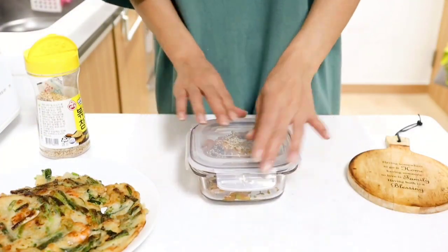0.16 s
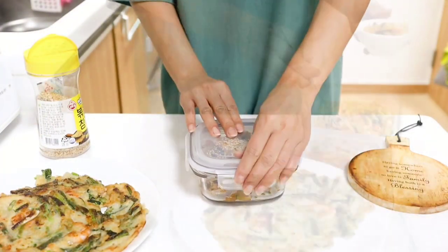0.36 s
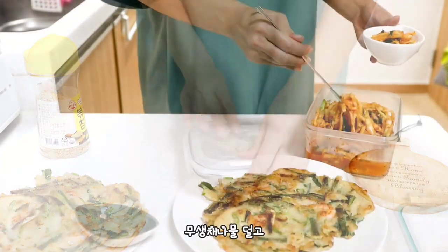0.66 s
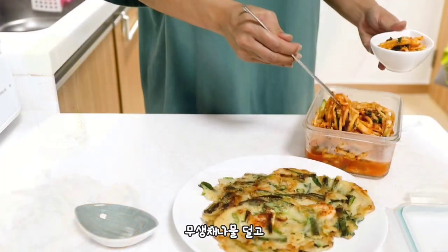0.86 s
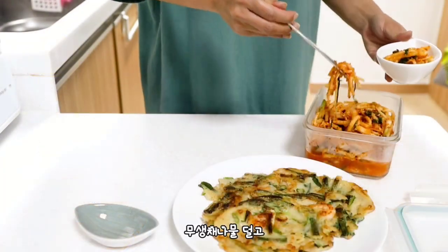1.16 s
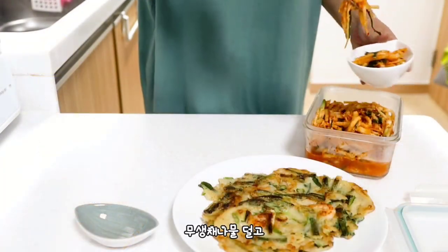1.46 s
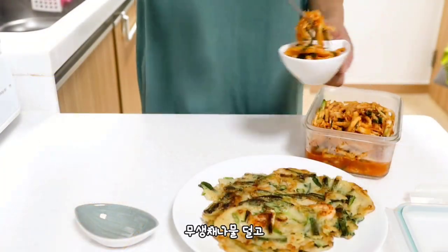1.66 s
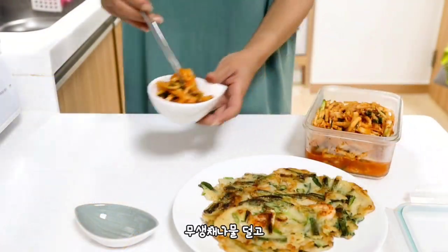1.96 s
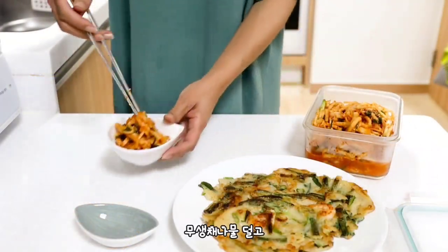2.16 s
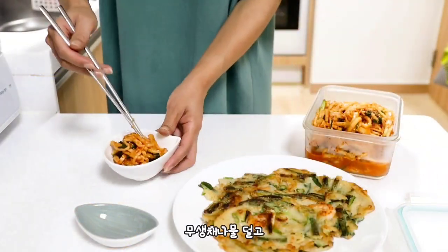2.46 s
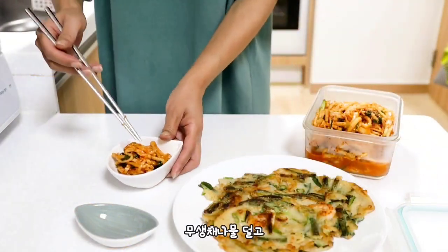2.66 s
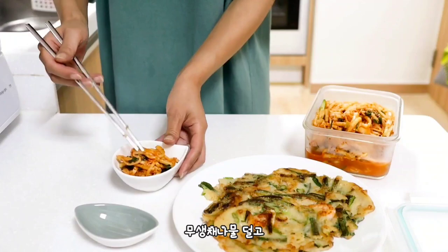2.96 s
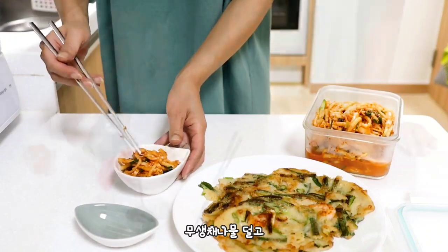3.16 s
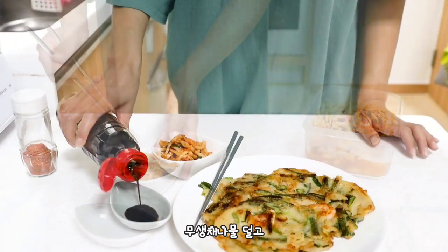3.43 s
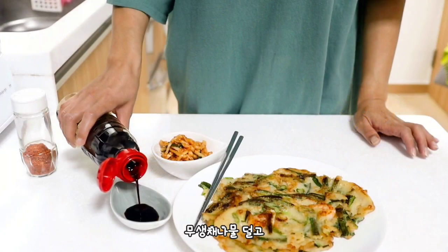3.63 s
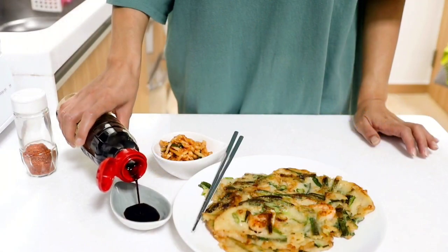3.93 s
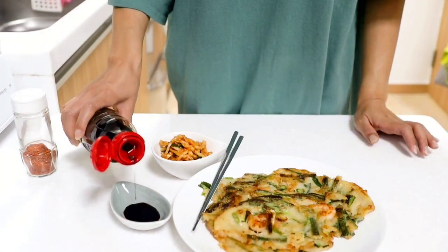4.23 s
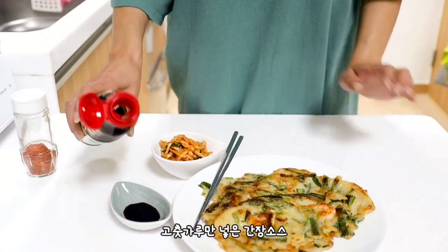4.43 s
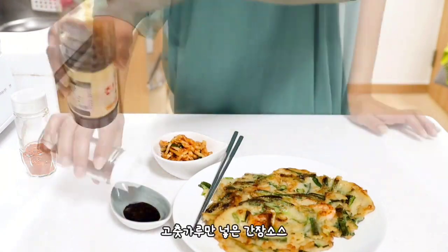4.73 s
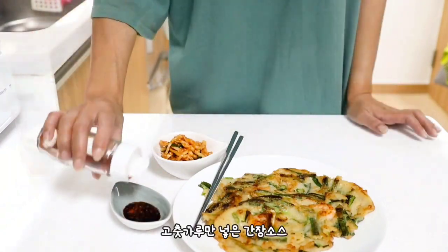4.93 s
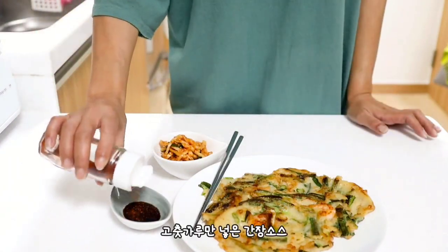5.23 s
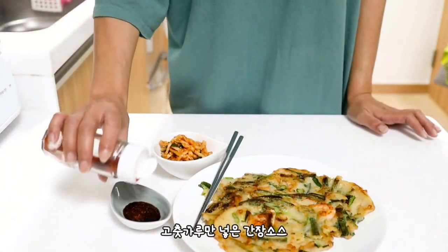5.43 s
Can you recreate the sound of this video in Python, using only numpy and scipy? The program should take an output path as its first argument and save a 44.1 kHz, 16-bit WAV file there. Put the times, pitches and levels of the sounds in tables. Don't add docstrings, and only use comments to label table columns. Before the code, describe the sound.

A home kitchen heard close up on a small stereo microphone, with a low, slightly unsteady fan hum, airy rush and soft hiss throughout. At 0 s a hard plastic flap has just snapped on a glass box, its tail ringing in the room. Dull finger thumps come around 0.3 s, small clicks at 0.4, then two very loud, bright snaps at about 0.44 and 0.51 s, slightly overloaded, with a half-second hard-walled decay. Mostly fan follows, with minute chopstick ticks from 1.5 to 2 s. Faint rustling and thin high squeaks lead to a loud, damped dish knock at 2.65 s, thumpy and short. A bowl lands much more softly at 3.12 s in quick touches, and again, duller, at 3.34 s. Around 4.4 s a cap ticks faintly with a very quiet squeak; a bottle touch at 4.6 and a jar touch at 4.8 s follow, with slight rustling fading toward 5.6 s.

```python
import sys
import numpy as np
from scipy import signal
from scipy.fft import rfft, irfft, next_fast_len
from scipy.io import wavfile
from scipy.ndimage import uniform_filter1d, map_coordinates

SR = 44100
rng = np.random.default_rng(int(sys.argv[2]) if len(sys.argv) > 2 else 0)


def field_ratio(decibels):
    return 10 ** (np.asarray(decibels, dtype=float) / 20)


def waveform_to_disk(signal):
    frames = np.transpose(np.atleast_2d(signal))
    scaled = np.clip(frames, -1, 1) * 32767
    samples = np.round(scaled).astype(np.int16)
    wavfile.write(sys.argv[1], SR, samples)


N = 246519
LEAD = SR // 10


# frequency in Hz, level in dB, t60 in s.
SIDE_MODES = [(743, -26, 0.0146), (1940, 14, .02), (5270, 6, 0.0087)]
FRONT_MODES = [(570, -16.5, 0.028), (855, -17.5, 0.021), (1434, -22, 0.025), (2550, -12, 0.005),
               (3100, -4, 0.0068), (3970, 1.5, 0.0047), (4600, -4, 0.0072), (5720, -4, 0.0084),
               (6950, 8.5, 0.0031), (7700, -10, 0.0029), (9900, -19, 0.0058), (10960, -5.5, 0.012),
               (15000, -27, 0.00523)]
BACK_MODES = [(980, -10.5, 0.011), (1410, -14, 0.023), (1710, -11, 0.014), (1950, 3.5, 0.0055),
              (2360, -4.5, 0.011), (2910, -11, 0.011), (3900, -3, 0.0096), (4150, -5, 0.011),
              (4960, -2.5, 0.0048), (6440, -1, 0.00313), (8400, -16, 0.014), (9170, -1, 0.0044),
              (10700, -14, 0.005), (14700, -23, 0.00586)]
# frequency in Hz, level in dB per Hz.
SIDE_POWER = [(200, -25), (400, -10.5), (800, -7), (1450, -7), (1950, 0.5), (2300, -8.5), (2700, -12),
              (4500, -11), (5400, -9.5), (6500, -16), (8400, -14.5), (11200, -20.5), (12500, -32),
              (15000, -46)]
FRONT_POWER = [(180, -35), (300, -9.5), (627, -1), (884, -11), (1310, -6), (1420, -6), (1590, -14),
               (4390, -11), (7060, -15), (10800, -28), (11900, -25), (12500, -72.5), (15000, -103)]
BACK_POWER = [(200, -35), (500, -31), (800, -2), (1440, -2.5), (2100, -1.5), (2700, -7.5), (3400, -9.5),
              (4100, 1), (4500, -4), (5100, -7), (5900, -12), (8000, -11.5), (10100, -8.5), (11600, -21),
              (13000, -64)]
# start in s, peak in dB, contact time in ms, room in dB, left minus right in dB.
SIDE_SNAPS = [
    (-.035, 2.5, 0.05, -23.5, 0),
]
FRONT_SNAPS = [
    (.4350, 2.7, 0.075, -31.5, -.6),
]
BACK_SNAPS = [
    (0.5132, 3.1, 0.04, -25.5, 0.1),
]


def lid_flaps():
    lid = blows(SIDE_MODES, SIDE_POWER, SIDE_SNAPS, crack_db=-20, wide_db=-4)
    lid += blows(FRONT_MODES, FRONT_POWER, FRONT_SNAPS, crack_db=-12.5, wide_db=-11)
    lid += blows(BACK_MODES, BACK_POWER, BACK_SNAPS, crack_db=-13, wide_db=-7.5)
    return lid


# frequency in Hz, level in dB, t60 in s.
DISH_MODES = [(112, -28.5, 0.15), (222, -19.5, 0.088), (272, -15, 0.055), (394, -24, 0.042),
              (590, -25, 0.021), (720, -3, 0.014), (954, -10.5, 0.034), (1115, -9.5, 0.038),
              (1340, -18, 0.02), (1680, -8, 0.024), (2127, 4, 0.016), (2534, 2.5, 0.012), (3100, 1, 0.0084),
              (3800, -17, 0.017)]
# frequency in Hz, level in dB per Hz.
DISH_POWER = [(60, -38), (110, 2.5), (210, -1.5), (330, -3.5), (460, -3.5), (760, 1.5), (1100, -0.5),
              (1400, -1), (2050, 2), (2700, -7.5), (3300, -17.5), (3900, -27.5), (5300, -32), (6200, -52),
              (9000, -74)]
# start in s, peak in dB, contact time in ms, room in dB, left minus right in dB.
DISH_KNOCKS = [
    (2.6507, 5.007, 0.13, -21.5, -0.036),
]


def dish():
    return blows(DISH_MODES, DISH_POWER, DISH_KNOCKS, crack_db=-17, wide_db=-4.0)


# frequency in Hz, level in dB, t60 in s.
BOWL_MODES = [(270, -4.5, 0.046), (584, 5, 0.032), (726, 2.5, 0.061), (826, -4, 0.076), (965, -23, 0.046),
              (1347, 2, 0.045), (1543, -0.5, 0.047), (1740, 8, 0.016), (2200, 9, 0.04), (2680, 6.5, 0.019),
              (3060, -0.5, 0.035), (3470, -7, 0.035), (4880, -24, .07)]
# frequency in Hz, level in dB per Hz.
BOWL_POWER = [(88, -55), (150, -28), (242, -2), (442, -11.5), (650, -6.5), (724, 2), (794, -8), (986, -4.5),
              (1080, -11), (1470, -9.5), (1800, -10), (1970, -8), (2270, -13.5), (2860, -23), (6000, -68),
              (7800, -81), (13200, -120)]
# start in s, peak in dB, contact time in ms, room in dB, left minus right in dB.
BOWL_SET_DOWNS = [
    (3.065, -39, 0.3, -4.5, .1),
    (3.1170, -26, 0.2, -24, 0.85),
    (3.1212, -19.5, 0.22, -12.5, 1.36),
    (3.1240, -19.5, 0.196, -11.5, 5.9),
    (3.3434, -22.5, 0.55, -18, 2.1),
    (3.3481, -22.5, 0.26, -19, 2.6),
]


def bowl():
    return blows(BOWL_MODES, BOWL_POWER, BOWL_SET_DOWNS, crack_db=-46, wide_db=3.0)


# delay in s, level in dB.
WALL_ECHOES = [(.0135, -25), (0.03, -51), (0.044, -31.5)]


def blows(modes, power, rows, crack_db, wide_db):
    track = np.zeros((2, N + LEAD))
    t = np.arange(SR // 50) / SR
    for s, db, contact_ms, room_db, pan_db in rows:
        struck = [(hz, level - 10 * np.log10(1 + (hz * contact_ms / 400) ** 4), t60) for hz, level, t60 in modes]
        pair = ring(struck, contact_ms / 700, pan_db, wide_db)
        add(track, s, field_ratio(db) * pair)

        contact_samples = max(2, round(contact_ms * SR / 1000))
        noise = uniform_filter1d(rng.standard_normal((2, len(t))), size=contact_samples, axis=1)
        crack = 0.85 * noise[0] + 1.2 * np.gradient(noise[1]) * np.array([[1], [-1]])
        add(track, s, field_ratio(db + crack_db - 60 * t / 0.014) * crack)

        for delay_s, wall_db in WALL_ECHOES:
            scatter = uniform_filter1d(rng.standard_normal((2, 96)), size=4, axis=1) / 5
            echo = signal.fftconvolve(pair, scatter, axes=1)
            add(track, s + delay_s, field_ratio(db + wall_db) * echo)
        add(track, s, field_ratio(db + room_db) * room(power))
    return track[:, LEAD:]


# frequency in Hz, side minus mid in dB.
NEAR_SIDE = [(300, -37), (1000, -8.5), (2400, -3), (5000, 1.5), (9000, 2.5), (15000, 4)]


def ring(modes, rise_s, pan_db, wide_db=0):
    t = np.arange(SR // 5) / SR
    hz, db, t60 = np.transpose(modes)[:, :, None]
    size = field_ratio(db - 60 * t / t60) * (1 - np.exp(-t / rise_s)) ** 2
    phase = 2 * np.pi * rng.random((2, len(modes), 1))
    mid = np.sum(size * np.sin(2 * np.pi * hz * t + 0.14 * phase[0]), 0)
    side_size = size * field_ratio(along(NEAR_SIDE, hz) + wide_db)
    side = np.sum(side_size * np.sin(2 * np.pi * hz * t + phase[1]), 0)
    return np.array([mid + side, mid - side]) * field_ratio([[pan_db / 2], [-pan_db / 2]])


# frequency in Hz, t60 in s.
ROOM_T60 = [(150, 0.45), (500, 0.6), (2000, 0.47), (5000, 0.44), (10000, 0.44), (15000, 0.39)]


def room(power):
    hz, t, z = signal.stft(rng.standard_normal((2, SR * 3 // 4)), SR, nperseg=128)
    build = 1 - np.exp(-np.clip(t - .004, 0, None) / 0.0075)
    decay = field_ratio(-60 * t / along(ROOM_T60, hz)[:, None])
    tail = signal.istft(z * build * decay, SR, nperseg=128)[1]
    tail = diffuse(tail, power)
    return tail / np.std(tail[:, :SR // 10])


# frequency in Hz, level in dB, t60 in s.
HINGE = [(1093, -4, .01), (2200, -6, .008), (4540, -14, 0.0062), (11300, -19, .004)]
RIM = [(517, -0.5, 0.019), (1184, -5, 0.013), (1900, -5.5, 0.011)]
CAP = [(3150, 0, 0.011), (4760, 1, 0.0073), (5600, 3, 0.0057), (6500, -5, 0.0046), (9900, -5, .005)]
CAP_STRAP = [(2610, -3, .028), (3140, 0.5, .016)]
BOTTLE = [(1883, -3.5, .04), (2800, -11, 0.022), (4500, -12, .006), (5900, -15, 0.0095),
          (8300, -12, 0.0044)]
JAR = [(282, -1.8, 0.08), (3700, -15, 0.01), (4800, -16, 0.0058), (7500, -18, 0.0065), (10330, -17, .008)]
JAR_LID = [(7690, 4, .005), (10600, 2, 0.009), (13200, -11.5, .005)]
# start in s, peak in dB, left minus right in dB, modes of the thing.
CONTACTS = [
    (.382, -24, -2, HINGE),
    (0.3957, -18.5, 1, RIM),
    (.491, -18, 2, RIM),
    (4.3985, -35.5, 8, CAP),
    (4.435, -35, 0, CAP_STRAP),
    (4.6245, -26, 8, BOTTLE),
    (4.788, -24.5, 2, JAR),
    (4.8265, -40, 4, JAR_LID),
]
# start in s, peak in dB, frequency in Hz, t60 in s, left minus right in dB.
TOUCHES = [(.284, -42, 2810, 0.0087, -.4), (0.302, -17, 132, 0.041, 1), (0.313, -21, 85.6, 0.099, 0.1),
           (0.322, -21, 141, 0.042, -3), (0.4246, -17.5, 1390, 0.0215, 6), (0.423, -21, 3100, 0.0073, -3),
           (.4265, -17, 590, 0.009, 7.5), (1.5475, -42, 11400, .005, -0.94), (1.789, -35.5, 9900, .005, -1),
           (1.847, -48, 10470, 0.0044, 2), (1.883, -43, 11800, .003, 0.1), (1.952, -53, 4900, .09, 2),
           (4.291, -39, 9600, 0.007, -9), (4.426, -40, 4400, 0.011, 8), (4.646, -34, 3961, 0.026, 8)]


def handling():
    skin_s = 0.000087
    track = np.zeros((2, N + LEAD))
    single = [(s, db, pan_db, [(hz, 0, t60)]) for s, db, hz, t60, pan_db in TOUCHES]
    for s, db, pan_db, modes in single + CONTACTS:
        pair = np.zeros((2, SR // 5))
        for hz, level, t60 in modes:
            group = [(hz, level, t60), (hz * 1.3, level - 12.5, t60 * 0.95), (hz * .86, level - 12, t60 * .6)]
            pair += ring(group, skin_s + 0.31 / hz, pan_db)
        add(track, s, field_ratio(db) * pair)
        flat_room = room([(100, 0.0041), (16000, 0)])
        add(track, s, field_ratio(db - 50) * signal.fftconvolve(pair[:1], flat_room, axes=1))
    return track[:, LEAD:]


# start in s, rise in s, fall in dB per s, rms in dB.
RUSTLES = [
    (2.202, 0.16, 26, -61),
    (4.25, .08, 18, -63),
    (4.55, 0.22, 45, -54.5),
    (4.9, .1, 18, -66),
]
RUSTLE_STOPS_S = [2.65, 4.7, 5.3, 5.59]
# frequency in Hz, level in dB per Hz.
RUSTLE_COLOUR = [(4000, -44), (6000, -11), (9500, -6), (12000, -8), (15000, -23), (16500, -39)]


def rustle():
    t = np.arange(N) / SR
    size = np.zeros(N)
    for (s, rise_s, fall_db, db), stop_s in zip(RUSTLES, RUSTLE_STOPS_S):
        swell = np.clip((t - s) / rise_s, 0, 1) ** 2
        fade = field_ratio(db - fall_db * np.clip(t - s - rise_s, 0, None))
        size += swell * fade * (t < stop_s)
    grainy = rng.standard_normal((2, N)) * field_ratio(3.3 * wobble(90))
    return size * unit(diffuse(grainy, RUSTLE_COLOUR))


# start in s, length in s, first and last frequency in Hz, rms in dB.
SQUEAKS = [
    (2.4, .13, 12950, 12750, -71),
    (2.565, .05, 12900, 12600, -72),
    (4.42, .2, 11700, 12400, -77),
    (4.42, .22, 10500, 11350, -71),
]


def squeaks():
    fade_s = .015
    out, t = np.zeros(N), np.arange(N) / SR
    for s, length_s, first_hz, last_hz, db in SQUEAKS:
        hz = np.interp(t, [s, s + length_s], [first_hz, last_hz])
        hz = hz + 40 * wobble(150) + 70 * wobble(20)
        sounding = np.clip(np.minimum(t - s, s + length_s - t) / fade_s, 0, 1)
        size = sounding * field_ratio(db + 6.1 * wobble(25) + 3.6 * wobble(60))
        out += size * np.sin(2 * np.pi * np.cumsum(hz) / SR)
    return out * np.array([[1.6], [.4]])


# time in s, level in dB.
AIR_LEVEL = [(0.0, -40.5), (0.2, -42), (1.87, -38), (2.3, -39), (2.79, -39), (3.5, -41.5), (4.13, -37.5),
             (4.86, -42.5), (5.15, -38.5), (5.59, -39)]
# frequency in Hz, level in dB per Hz.
RUSH_COLOUR = [(12, -44), (20, -13.5), (49, -2.5), (127, -11), (144, -6), (161, -6), (187, -3), (248, -6),
               (272, -6), (376, -6.5), (459, -9), (645, -7), (800, -14.5), (1040, -40), (1760, -120)]
HISS_COLOUR = [(470, -12.5), (800, -3.5), (896, -3.5), (978, 0.5), (1240, -7), (1350, -2), (1480, -7),
               (2020, -12), (2210, -13.5), (2600, -17.5), (8130, -33.5), (11400, -34), (14700, -47),
               (16000, -58)]


def fan():
    rush_db, hiss_db, hum_db, hum_hz = 0.5, -1.5, -1.5, 161.8
    hiss_follows, hum_follows = 0.68, 0.35
    level_db, = curves(AIR_LEVEL)
    mean_db = level_db.mean()
    swing_db = level_db - mean_db
    noise = rng.standard_normal((2, 2, N))
    rush = field_ratio(rush_db + swing_db + 0.38 * wobble(10.0)) * unit(diffuse(noise[0], RUSH_COLOUR))
    hiss_size = field_ratio(hiss_db + hiss_follows * swing_db + 0.32 * wobble(5.55))
    hiss = hiss_size * unit(diffuse(noise[1], HISS_COLOUR))
    unsteady_db = 1.5 * wobble(6)
    drift_hz = 1.2 * wobble(10) + wobble(1)
    hum_size = field_ratio(hum_db + hum_follows * swing_db + unsteady_db)
    hum = hum_size * np.sin(2 * np.pi * np.cumsum(hum_hz + drift_hz) / SR)
    return field_ratio(mean_db) * (rush + hiss + hum) * field_ratio([[-.4], [.4]])


# frequency in Hz, left-right likeness from -1 to 1.
LIKENESS = [(60, 0.96), (130, 0.936), (290, 0.74), (640, 0.57), (1410, -0.13), (3100, -0.58), (6820, -0.66),
            (15000, -0.56)]


def diffuse(pair, points):
    length = pair.shape[1]
    m = next_fast_len(length + 8192)
    hz = np.fft.rfftfreq(m, 1 / SR)
    likeness = np.clip(along(LIKENESS, hz), -.9, 1)
    side_gain = np.sqrt((1 - likeness) / (1 + likeness))
    spectra = rfft(pair, m) * field_ratio(along(points, hz)) * [np.ones(len(hz)), side_gain]
    mid, side = irfft(spectra, m)[:, :length]
    return np.array([mid + side, mid - side])


def unit(x):
    return x / np.sqrt(np.mean(x ** 2) + 1e-20)


def along(points, hz):
    f, v = np.transpose(points)
    return np.interp(np.log(hz + 1), np.log(f + 1), v)


def curves(rows):
    s, *cols = np.transpose(rows)
    return [np.interp(np.arange(N) / SR, s, c) for c in cols]


def wobble(rate):
    knots = rng.standard_normal(int(N * rate / SR) + 4)
    return map_coordinates(knots, [np.arange(N) * rate / SR])


def add(track, s, sound):
    part = track[:, round(s * SR) + LEAD:][:, :sound.shape[1]]
    part += sound[:, :part.shape[1]]


def scene():
    contacts = lid_flaps() + dish() + bowl() + handling()
    no_bass = signal.butter(2, 75, "high", fs=SR, output="sos")
    return signal.sosfilt(no_bass, contacts) + rustle() + squeaks() + fan()


def low_pass(x):
    return signal.sosfilt(signal.butter(12, 16580, fs=SR, output="sos"), x)


def record(dry):
    clipped = dry / (1 + np.abs(dry / .98) ** 12) ** (1 / 12)
    return low_pass(clipped)


dry = scene()
out = record(dry)
waveform_to_disk(out)
```